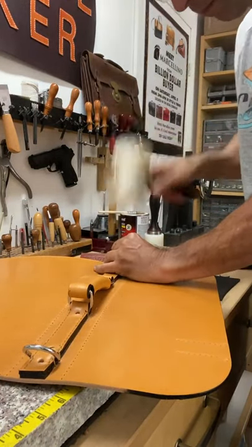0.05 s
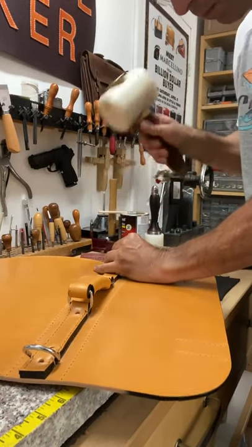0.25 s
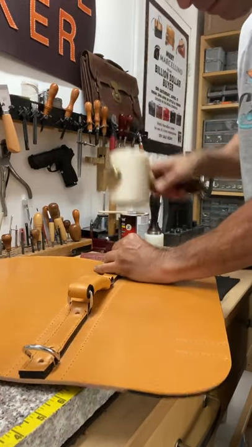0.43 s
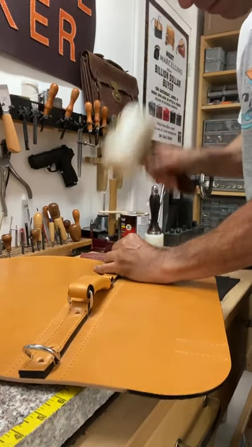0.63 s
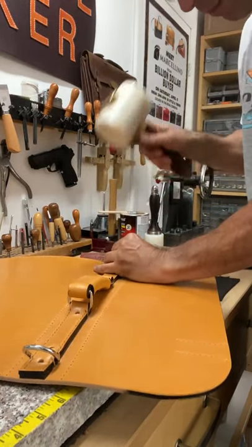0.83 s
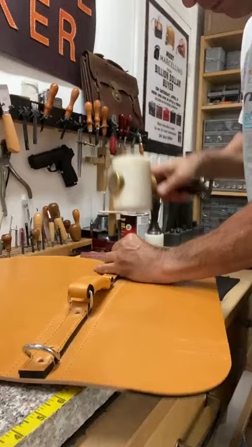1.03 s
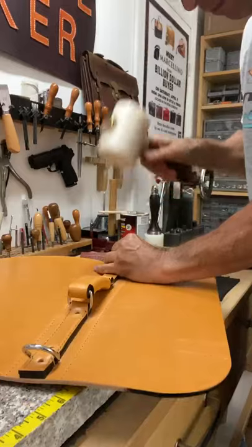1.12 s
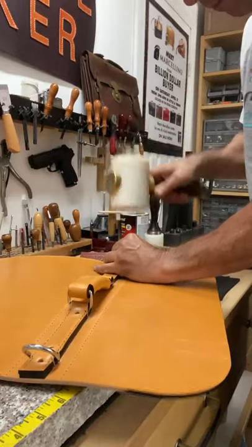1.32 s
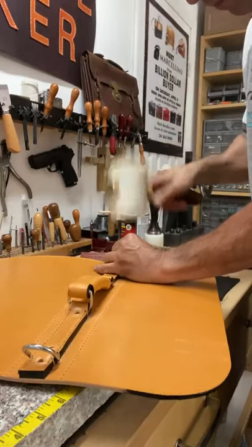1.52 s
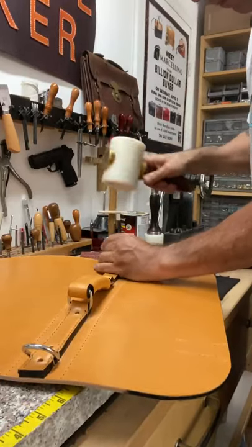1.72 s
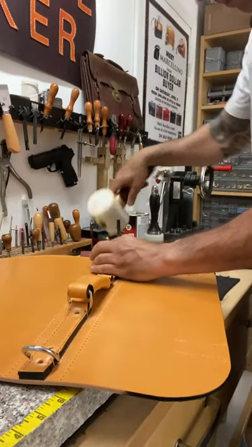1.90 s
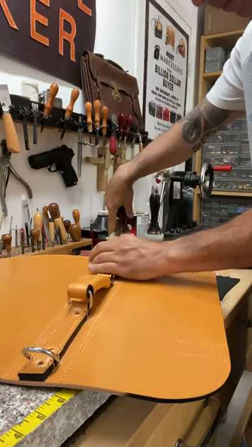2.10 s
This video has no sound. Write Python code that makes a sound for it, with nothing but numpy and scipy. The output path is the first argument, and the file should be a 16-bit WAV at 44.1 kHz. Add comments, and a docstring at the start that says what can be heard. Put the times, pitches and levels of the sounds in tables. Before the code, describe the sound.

A mallet strikes a steel punch through leather six times, booming and rattling the workbench.

```python
"""A small workshop, a stereo microphone near the bench: a mallet drives a steel punch through leather.
We come in just after one blow, over low room rumble, and six more follow at a nearly even pace.
Each is a tick, a dry knock and a falling thud, loud enough to overload the microphone a little.
Then the bench booms, bounces on its legs and shakes the tools on it; in the gaps something loose rocks
and faint steel tones are heard. After the last blow, the low rumbling noise fades sooner."""
import sys
import numpy as np
from scipy import signal
from scipy.fft import rfft, irfft
from scipy.io import wavfile

SR = 44100
rng = np.random.default_rng(int(sys.argv[2]) if len(sys.argv) > 2 else 0)


def store_pcm(level_fs):
    """Save levels as 16-bit WAV."""
    pcm = np.round(np.clip(level_fs, -1, 1) * 32767).astype(np.int16)
    wavfile.write(sys.argv[1], SR, np.atleast_2d(pcm).T)


N = 94815
T = np.arange(int(.7 * SR)) / SR  # seconds since a blow


def amp(db):
    """Decibels to gain."""
    return 10 ** (np.asarray(db) / 20)


def fade(t60_s):
    """Exponential decay, 60 dB down at t60_s."""
    return np.exp(-np.log(1000) * T / t60_s)


def rise(seconds):
    """Soft attack."""
    return 1 - np.exp(-T / seconds)


def mode(hz, db, t60_s, turns=0):
    """One resonance: a dying sine."""
    return amp(db) * fade(t60_s) * np.sin(2 * np.pi * (hz * T + turns))


def delayed(sound, lag_s):
    """The same sound arriving a little later."""
    return np.interp(T - lag_s, T, sound)


def read(table, hz, column=1):
    """One column of a table on a log-frequency axis."""
    columns = np.transpose(table)
    return np.interp(np.log(hz + 1), np.log(columns[0]), columns[column])


def pan(left_db):
    """Channel gains: left up by left_db, right down by as much."""
    return amp([[left_db], [-left_db]])


def add(mix, start_s, sound):
    """Mixes a sound in at a time, which may lie before the start."""
    at = round(start_s * SR)
    sound = sound[..., max(-at, 0):]
    part = mix[:, max(at, 0):][:, :sound.shape[-1]]
    part += sound[..., :part.shape[1]]


def noise(table, size, width, central_hz=434):
    """Stereo noise of rms 1, shaped by a table of relative densities; the bass stays central."""
    hz = np.fft.rfftfreq(size, 1 / SR)
    mid, side = rfft(rng.standard_normal((2, size))) * amp(read(table, hz))
    side = side * width * hz ** 2 / (hz ** 2 + central_hz ** 2)
    stereo = irfft(np.array([mid + side, mid - side]), size)
    return stereo / stereo.std()


# The workshop's own rumble: frequency_hz, density_db
RUMBLE_SPECTRUM = [(20, -2), (60, -9.5), (130, -1), (250, -14), (500, -24), (1000, -35), (2500, -42),
                   (6000, -48.5), (11000, -70), (16000, -67)]


def room_rumble():
    """Steady low noise in the room, far below the blows."""
    return amp(-47.5) * noise(RUMBLE_SPECTRUM, N, width=.4)


# Thin steel, faint at the microphone: pitch_hz, level_db
STEEL_TONES = [(3273, -63.5), (4030, -64.5), (5044, -64.5), (5206, -70.5), (6223, -64.5), (6584, -53),
               (8118, -62.5), (9705, -54.5), (11860, -72.5), (13240, -75)]


def steel_ring(full_at_s=.195, turn_up_s=.065, turn_down_s=.07, flutter_db=3.5, flutter_step_s=.006):
    """Faint, rough high tones, turned down at each blow and heard again in the gaps."""
    gap_gain = np.exp(-((T - full_at_s) / np.where(T < full_at_s, turn_up_s, turn_down_s)) ** 2)
    out = 0
    for hz, db in STEEL_TONES:
        turns = rng.random() + .41 * rng.random((2, 1))
        steps = rng.standard_normal(128)
        flutter = np.interp(T / flutter_step_s, np.arange(len(steps)), steps)
        out += amp(db + flutter_db * flutter) * np.sin(2 * np.pi * (hz * T + turns))
    return gap_gain * out


# A loose object's tap, wide in the stereo image: frequency_hz, density_db
TAP_SPECTRUM = [(426.5, -16), (853, 0), (1390, -15), (2800, -22), (6000, -42), (16000, -70)]


def rocking(first_s=.1505, every_s=.0615, first_db=-32.5, step_db=-4.5):
    """Something loose rocks on the bench: four dull taps, each fainter."""
    out = np.zeros((2, len(T)))
    for k in range(4):
        tap = rise(.0006) * fade(.045) * noise(TAP_SPECTRUM, len(T), width=1)
        add(out, first_s + k * every_s, amp(first_db + k * step_db) * tap)
    return out


# The bench between blows, straight ahead: frequency_hz, density_db
SHUDDER_SPECTRUM = [(40, -14), (100, 8), (185, -0.5), (260, -13), (380, -10.5), (600, -17), (1000, -18),
                    (1600, -27), (2800, -30), (4500, -37), (9000, -43.5), (12000, -78), (16000, -79.5)]


def bench_shudder(hold_s, release_s=.1):
    """A low rumbling noise from the loaded bench; its level holds for a while, then fades."""
    envelope = rise(.013) / (1 + np.exp((T - hold_s) / release_s))
    return amp(-35.5) * pan(-.05) * envelope * noise(SHUDDER_SPECTRUM, len(T), width=.78)


# Boards and tools, left of the microphone: pitch_hz, level_db, t60_s
TOOL_MODES = [(282.5, -22.5, 0.21), (419.2, -22, 0.22), (492, -23, 0.24), (623.6, -23.5, 0.27),
              (841, -28.5, 0.18), (905, -25.5, .15), (964, -35.5, .17), (1168, -38.5, 0.078),
              (1270, -27.5, 0.24), (1996, -41, 0.38), (2340, -34.5, .22), (2480, -34, .22),
              (2750, -49, 0.33), (2960, -48.5, 0.34)]


def tool_rings(vary_db=1.2, detune=.005):
    """Boards and tools ring at their own pitches, a little differently at each blow and in each channel."""
    out = 0
    for hz, db, t60_s in TOOL_MODES:
        strength, mistuning, phase_gap = rng.standard_normal(3)
        turns = rng.random() + phase_gap * np.array([[0], [.11]])
        out += mode(hz * (1 + detune * mistuning), db + vary_db * strength, t60_s, turns)
    return pan(7) * rise(.007) * out


# Shaken tools and the room, all around the microphone: frequency_hz, density_db, t60_s
RATTLE_BANDS = [(100, -25.5, 0.34), (184, -7, 0.4), (250, -1.5, 0.26), (556, -2.5, 0.26),
                (1208, -9.5, 0.25), (1680, -15.5, 0.27), (2590, -16.5, 0.29), (3340, -23, 0.23),
                (5670, -28.5, 0.27), (8200, -32, 0.27), (10180, -38, 0.35), (12500, -60.5, 0.24),
                (16000, -93, .1)]


def tool_rattle():
    """Shaken tools and the small room answer each blow, every band dying at its own speed."""
    hz, age_s, bands = signal.stft(noise(RATTLE_BANDS, len(T), width=.93), SR, nperseg=256)
    t60_s = read(RATTLE_BANDS, hz, column=2)[:, None]
    _, dying = signal.istft(bands * np.exp(-np.log(1000) * age_s / t60_s), SR, nperseg=256)
    return amp(-10.5) * pan(.1) * rise(.004) * dying[:, :len(T)]


def bench_bounce(first_s=.081, every_s=.0855, width_s=.019, pitch_hz=67.8, first_db=-16, step_db=-5.5):
    """The bench bounces on its legs, weaker each time."""
    out = 0
    for k in range(6):
        t = T - first_s - k * every_s
        pulse = np.exp(-(t / width_s) ** 2) * np.cos(2 * np.pi * pitch_hz * t)
        out += amp(first_db + k * step_db) * pulse
    return out


# Low modes of the bench, close to the microphone: pitch_hz, level_db, t60_s
BENCH_MODES = [(50.2, -9, 0.7), (77.9, 4.5, 0.27), (127.8, 4, 0.24), (153.3, 7.5, 0.18), (163.8, 2, 0.22)]


def bench_boom(choke_at_s=.031, choke_s=.002, choke_db=-12.5):
    """The bench top booms until the mallet lifts off and chokes it."""
    contact = 1 / (1 + np.exp((T - choke_at_s) / choke_s))
    choke = amp(choke_db) + (1 - amp(choke_db)) * contact
    boom = rise(.041) * sum(mode(hz, db, t60_s) for hz, db, t60_s in BENCH_MODES)
    return choke * delayed(boom, .0023)


def bench_thud(peak_s=.005603, pitch_at_peak_hz=394, spread=.39):
    """A bending wave crosses the bench top, high notes first, so the pitch drops within milliseconds."""
    age = np.maximum(T / peak_s, 1e-3)
    wave = np.cos(2 * np.pi * pitch_at_peak_hz * peak_s * (1 - 1 / age))
    envelope = np.exp(-(np.log(age) / spread) ** 2)
    return pan(2) * envelope * wave


# The held punch, close and central: pitch_hz, level_db, t60_s
PUNCH_MODES = [(3055, -20.5, .025), (4540, -8, 0.0044), (5000, -7.5, 0.0074), (6270, -20.5, 0.008),
               (7100, -27.5, 0.021), (8170, -23.5, 0.0077)]


def punch_clink():
    """The steel punch rings very briefly in the hand."""
    clink = sum((-1) ** k * mode(hz, db, t60_s) for k, (hz, db, t60_s) in enumerate(PUNCH_MODES))
    return np.array([clink, delayed(clink, .00002)])


# Mallet meeting punch, close and narrow: frequency_hz, density_db
TICK_SPECTRUM = [(300, -20), (1200, 22), (2800, -5.5), (3600, -11.5), (4900, -2.5), (6000, 0), (8500, 0),
                 (11000, -15.5), (14000, -21), (16000, -45)]


def contact_tick():
    """The instant of contact gives a bright burst of noise."""
    return amp(-12.5) * rise(.0001) * fade(.0098) * noise(TICK_SPECTRUM, len(T), width=.27)


# The mallet, close and to the left: pitch_hz, level_db, t60_s
MALLET_MODES = [(357, -20, 0.13), (509, -8.5, 0.045), (832, -12, 0.035), (1049, -4, 0.043),
                (1384, -10.5, 0.02), (1865, -13, 0.013), (2164, -10, 0.01), (2460, -27, 0.016),
                (2805, -26, 0.015)]


def mallet_knock(tilt_db_per_octave, detune=.012):
    """The mallet's short modes knock dryly; a squarer blow favours the high ones."""
    knock = 0
    for k, (hz, db, t60_s) in enumerate(MALLET_MODES):
        pitch_hz = hz * (1 + detune * rng.standard_normal())
        level_db = db + tilt_db_per_octave * np.log2(hz / 1000)
        knock += (-1) ** k * mode(pitch_hz, level_db, t60_s)
    knock *= rise(.0006)
    return pan(4) * np.array([knock, delayed(knock, .00004)])


# The blows, with a gain for each layer: start_s, bench_db, thud_db, knock_db,
# tilt_db_per_octave, clink_db, tick_db, tools_db, steel_db
BLOW_GAINS = [(-.104, 1, -12, -13, -2, -10, 0, 0.5, -4), (.2185, 1.5, -13.5, -1.5, 1.5, -0.5, 8.5, -1, 3.5),
              (.5238, 1, -22, -4.5, 3, 2, 9, -0.5, 2.5), (.8268, 1, -9.5, -1, 6.5, -3.5, -0.5, -0.5, -1.5),
              (1.1255, 0, -13, -3.5, 7, -5.5, 2, 0, -1.5),
              (1.412, 0.5, -5, -0.5, 6.5, -14.5, -0.5, -1, -9.5),
              (1.6783, 0, -4.5, -2.5, 4.5, -10.5, 0, -1, -8.5)]


def scene(echo_s=.0052, echo_db=-14.5):
    """What reaches the microphone: room rumble, the blows and their echo off the wall behind the bench."""
    mix = room_rumble()
    boom_and_bounce = pan(.32) * (bench_boom() + bench_bounce())
    for k, blow in enumerate(BLOW_GAINS):
        start_s, bench_db, thud_db, knock_db, tilt, clink_db, tick_db, tools_db, steel_db = blow
        is_last = k == len(BLOW_GAINS) - 1
        strike = amp(knock_db) * mallet_knock(tilt)
        strike += amp(clink_db) * punch_clink() + amp(tick_db) * contact_tick()
        shudder = bench_shudder(hold_s=.15 if is_last else .4)
        bench = amp(thud_db) * bench_thud() + amp(bench_db) * (boom_and_bounce + shudder)
        tools = amp(tools_db) * (tool_rattle() + tool_rings() + rocking())
        add(mix, start_s, strike + bench + tools + amp(steel_db) * steel_ring())
        add(mix, start_s + echo_s, amp(echo_db) * pan(-11) * strike)  # the wall answers from the right
    return mix


def record(dry, ceiling=.87, edge_hz=16400):
    """The near microphone overloads a little, rounding the loudest peaks; the top treble is cut off."""
    rounded = dry / (1 + (dry / ceiling) ** 6) ** (1 / 6)
    lowpass = signal.firwin(255, edge_hz, window=("kaiser", 9), fs=SR)
    return signal.oaconvolve(rounded, lowpass[None], "same")


dry = scene()
out = record(dry)
store_pcm(out)
```